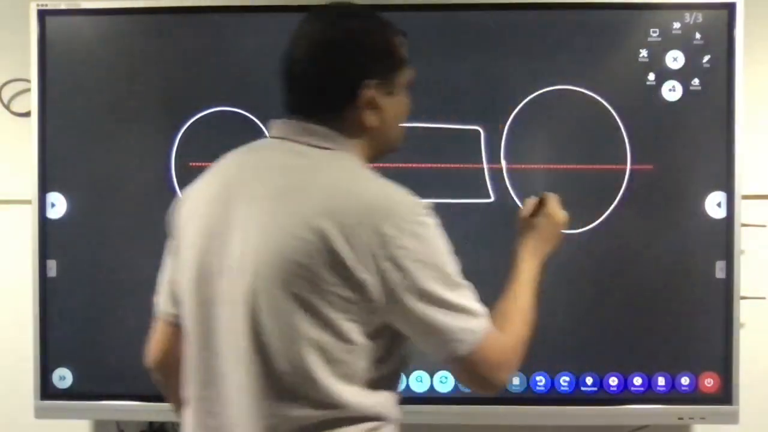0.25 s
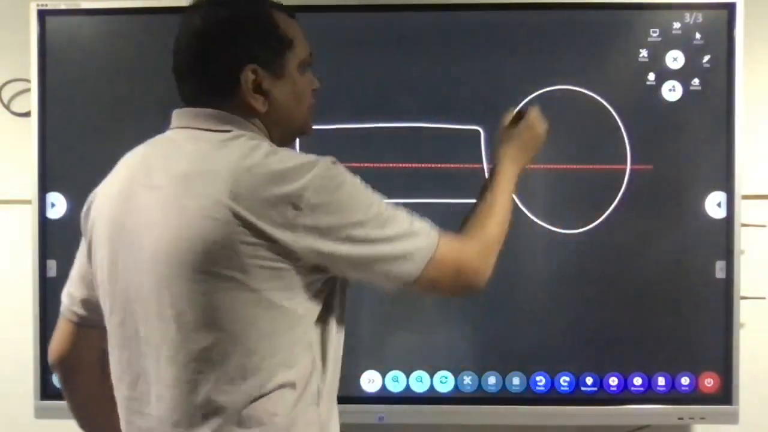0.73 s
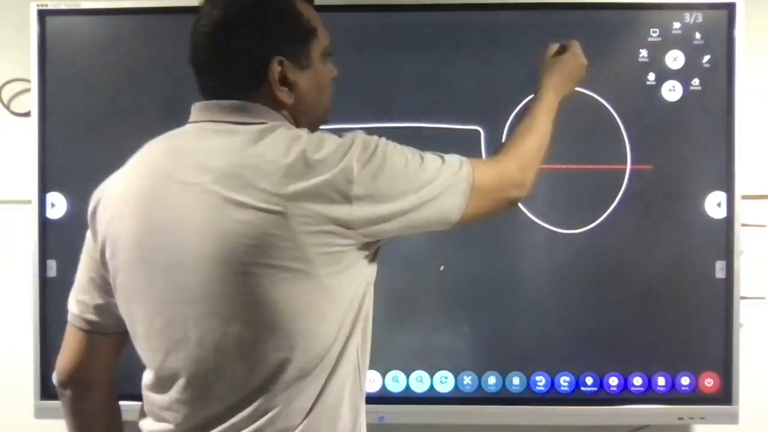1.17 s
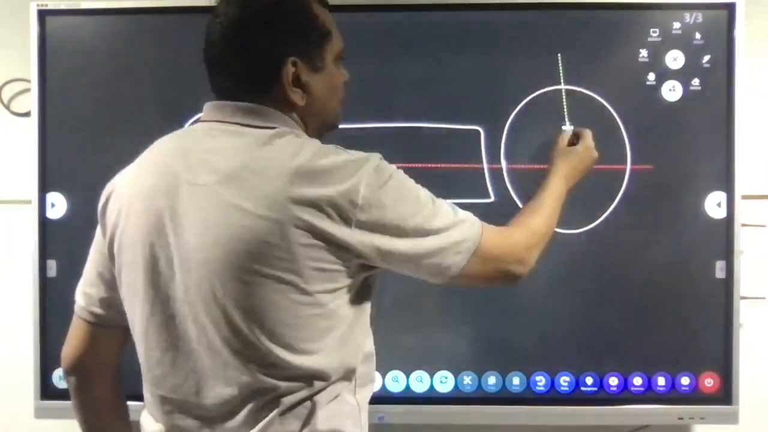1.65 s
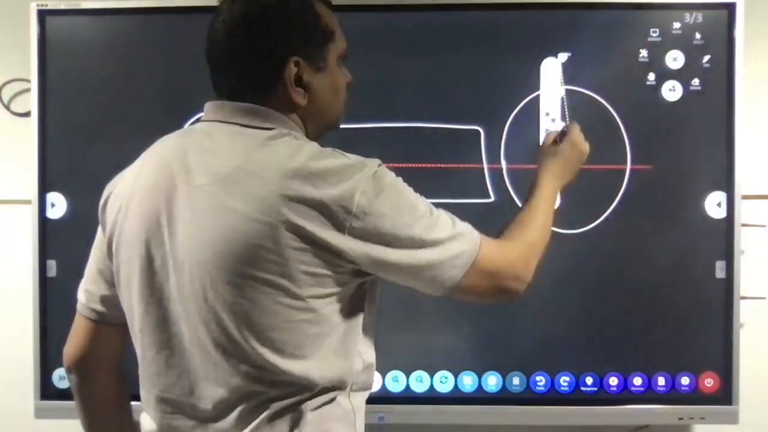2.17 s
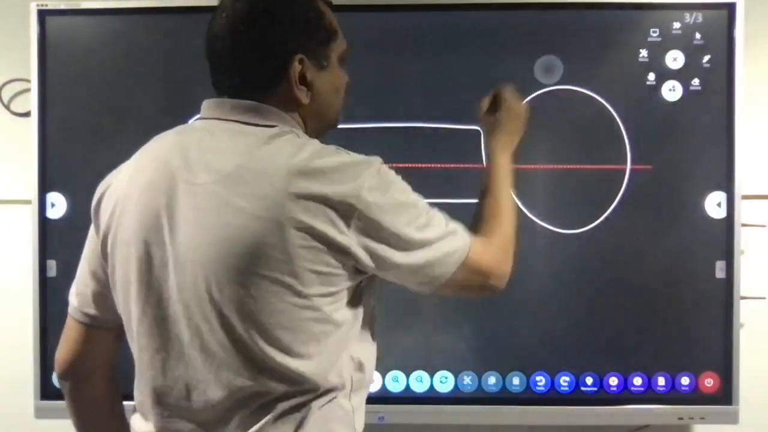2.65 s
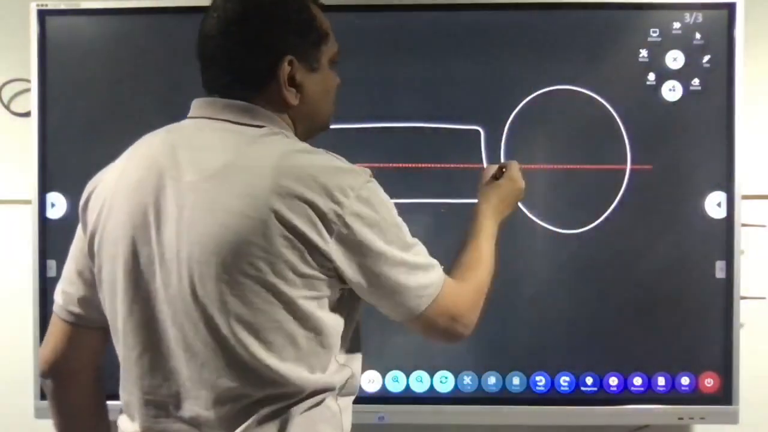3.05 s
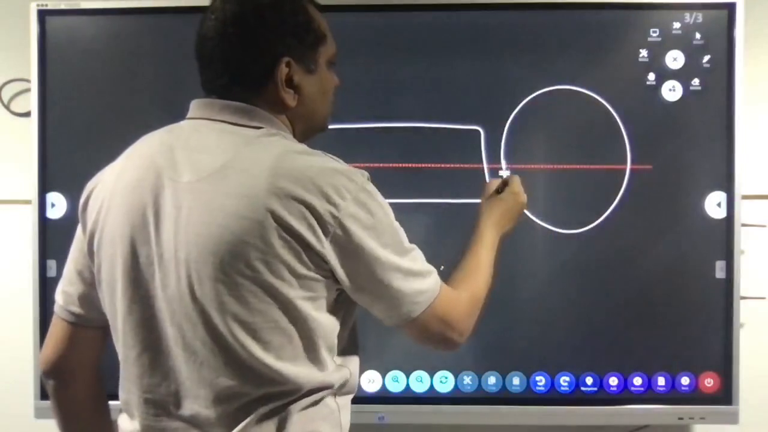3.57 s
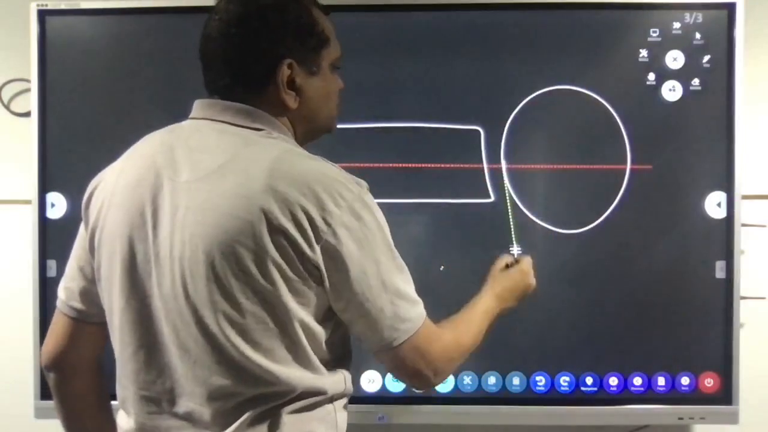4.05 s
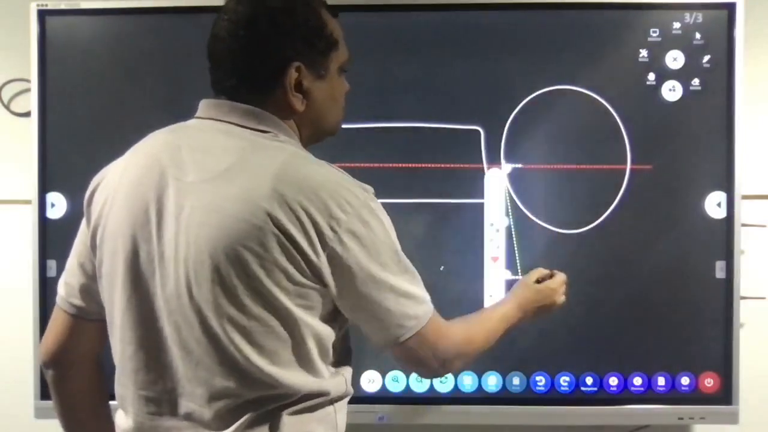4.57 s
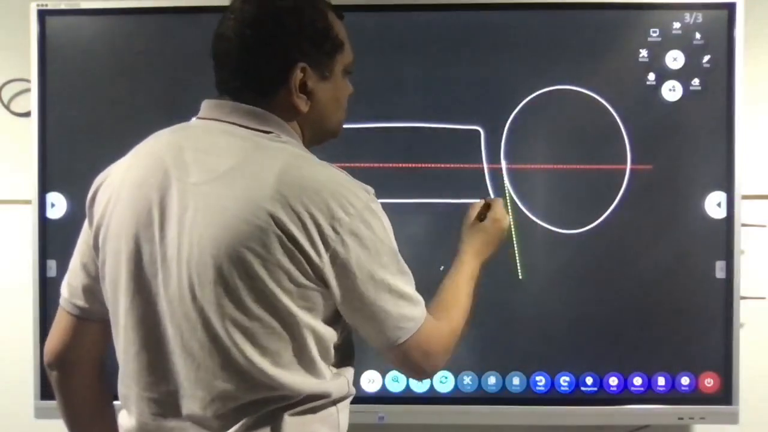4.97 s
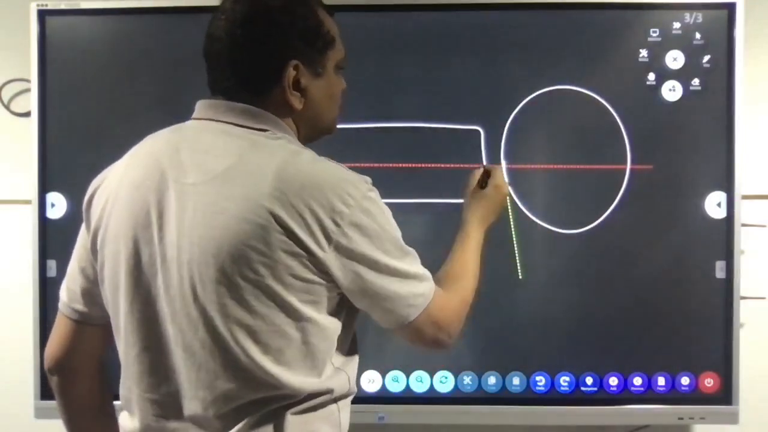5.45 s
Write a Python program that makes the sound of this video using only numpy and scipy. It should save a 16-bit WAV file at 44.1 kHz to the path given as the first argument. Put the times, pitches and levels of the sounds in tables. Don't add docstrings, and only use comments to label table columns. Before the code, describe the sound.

Shoes scuff and squeak, then irregular hollow stylus knocks and soft hissing strokes sound on a big glass panel under a thin electronic whine.

```python
import sys
import numpy as np
from scipy import signal
from scipy.io import wavfile
from scipy.ndimage import uniform_filter1d

SR = 44100
rng = np.random.default_rng(int(sys.argv[2]) if len(sys.argv) > 2 else 0)


def unload_audio(sound):
    columns = np.transpose(np.atleast_2d(sound))
    steps = np.round(np.clip(columns, -1, 1) * 32767)
    wavfile.write(sys.argv[1], SR, steps.astype(np.int16))


def invert_db(level):
    return 10 ** (np.asarray(level, dtype=float) / 20)


N = 252252


def evened(x):
    return x / np.sqrt(np.mean(x ** 2) + 1e-20)


def peaked(x, db):
    return invert_db(db) * x / np.sqrt(uniform_filter1d(x ** 2, size=220).max())


def read(points, hz):
    f, value = np.transpose(points)
    return np.interp(np.log(hz + 1), np.log(f + 1), value)


def add(mix, s, sound):
    at = round(s * SR)
    part = mix[max(at, 0):][:len(sound) + min(at, 0)]
    part += sound[max(-at, 0):][:len(part)]


def colour(x, db_at):
    hz = abs(np.fft.fftfreq(8192, 1 / SR))
    log_gain = db_at(hz) * np.log(10) / 20
    response = np.exp(np.conj(signal.hilbert(log_gain)))
    taps = np.fft.ifft(response).real[:4096]
    return signal.fftconvolve(x, taps)[:len(x)]


def impulse():
    blow = np.zeros(4096)
    blow[0] = 1
    return blow


def shelf(hz, edge_hz):
    return 1 / (1 + (edge_hz / (hz + 1)) ** 4)


def ring(modes, seconds):
    t = np.arange(round(seconds * SR)) / SR
    return sum(invert_db(db - 60 * t / t60) * np.sin(2 * np.pi * hz * t) for hz, db, t60 in modes)


def resonate(x, hz, width):
    turn = np.exp(2j * np.pi * np.cumsum(hz * np.ones(len(x))) / SR)
    r = np.exp(-np.pi * width / SR)
    return 2 * (turn * signal.lfilter([1 - r], [1, -r], x / turn)).real


# frequency in Hz, t60 in seconds.
ROOM_DECAY = [(100, 0.69), (260, 0.57), (700, 0.44), (1840, 0.62), (4200, 0.47), (6200, 0.49), (8000, 0.39),
              (16000, 0.5)]


def dying_noise(rise):
    hz, t, z = signal.stft(rng.standard_normal(SR), SR, nperseg=256)
    decay = invert_db(-60 * t / read(ROOM_DECAY, hz)[:, None])
    tail = signal.istft(z * decay, SR, nperseg=256)[1][:SR]
    return tail * (1 - np.exp(-np.arange(SR) / SR / rise)) ** 2


# delay in seconds, level in dB.
WALL_ECHOES = [(.0068, -3), (0.0129, -2), (0.023, -9)]


def room(x, wet_db, thin_hz, first_s, shade_db):
    tail = dying_noise(0.00043)
    early = np.zeros(SR)
    for k, (s, db) in enumerate([(.0004, shade_db), (first_s, -3)] + WALL_ECHOES):
        early[round(s * SR)] = invert_db(db) * (-1) ** k
    scatter = rng.standard_normal(90) * np.exp(-np.arange(90) / 19.0)
    scatter[0] = 0.88
    early = signal.lfilter(scatter / np.linalg.norm(scatter), 1, early)
    early[18] += invert_db(shade_db - 2.5)
    early[:31] -= invert_db(5) * np.hanning(31) / 15
    early = signal.lfilter(*signal.butter(1, thin_hz, "high", fs=SR), early)
    response = early + invert_db(wet_db) * tail / np.linalg.norm(tail)
    return signal.fftconvolve(x, response)[:SR]


# start in seconds, delay of the first wall in seconds,
# level in dB of the click that passes the writer's body.
LANDINGS = [
    (1.3234, .0037, -6),
    (2.4941, .0037, -2),
    (3.3402, .0045, -12),
    (4.655, .005, -13),
    (5.4287, .0045, -14),
    (5.5088, .004, -14),
]
# peak level in dB, boom of the panel in dB.
BLOWS = [
    (-23, -2),
    (-15, 1),
    (-29.5, 1),
    (-16.5, 0.3),
    (-36, 1.5),
    (-60, 1),
]
# frequency in Hz, density in dB per Hz.
GLASS = [(30, -52), (60, 1), (105, -10.5), (145, 7), (210, -3), (270, -0.5), (400, 0), (580, -1), (900, -8),
         (1300, -18.5), (1900, -18), (2500, -26), (6000, -27.5), (16000, -38.5)]
# frequency in Hz, level in dB, t60 in seconds.
PANEL = [(140, 0, 0.33), (194, -3, 0.37), (248, -4, 0.7), (305, -4, 0.5), (431, -8, 0.48), (490, -9, 0.44),
         (554, -11, 0.39), (689, -6, 0.3), (1534, -20, 0.34)]
# frequency in Hz, level in dB, t60 in seconds.
CASING = [(466.3, 0.5, 0.41), (579, 0, .28), (1063, -6.5, 0.48), (1123, -6, 0.36), (1520, -22, 0.15),
          (1920, -23, 0.41)]
# frequency in Hz, level in dB, t60 in seconds.
FRAME = [(789, -39, 5.3), (692, -43, 3.9)]
# frequency in Hz, level in dB, t60 in seconds.
BARREL = [(1580, -17, .09), (1805, -13, 0.057)]


def knock(first_s, shade_db, db, boom_db):
    harder_db = db + 23
    bright_db = -1.54 + 0.44 * harder_db
    hard_db = 1.26 + .3 * harder_db
    casing_db = -12 - 0.81 * harder_db
    blow = colour(impulse(), lambda hz: read(GLASS, hz) + bright_db * shelf(hz, 4200)
                  + hard_db * shelf(hz, 1430) + boom_db * (1 - shelf(hz, 254)))
    sound = peaked(room(blow, 2.83, 565, first_s, shade_db), db)
    swing = np.minimum(np.arange(SR) / SR / 0.034, 1)
    body = invert_db(-13.5 + boom_db) * ring(PANEL, 1)
    body = body + invert_db(min(casing_db, -11.5)) * ring(CASING, 1) + ring(FRAME, 1)
    barrel = invert_db(hard_db + .5 * shade_db) * ring(BARREL, 1)
    return sound + invert_db(db) * (swing * body + barrel)


# (without effect, the chatter stays at TIP_HZ).
STROKES = [
    (1.33, 1.555, 1.672, 4400, 4150),
    (3.45, 3.78, 4.2, 4150, 4950),
    (5.6, 5.78, 6.1, 3200, 5000),
]
# frequency in Hz, density in dB per Hz.
SLIDE = [(2400, -37.5), (3300, -20), (4500, 1), (5500, -12.5), (6500, -3.5), (9000, -2.5), (11500, -0.5),
         (13000, -17), (16000, -7)]
STROKE_DB, SPEED_UP_DB, SAG_DB_PER_S, LIFT_DB_PER_S = -53, 22, 12, 250
TIP_HZ, TIP_WANDER_HZ, SHANK_HZ = 4200, 90, 6250
CHATTER_SPAN_DB = 13
SHEEN_DB, SHEEN_GROWTH_DB = 2.5, 5
EARLY_SHARE, TIP_FADE_DB_PER_S = 0.46, 10


def stroke(start, fastest, lift, start_hz, chatter_hz):
    t = np.arange(SR) / SR + start
    slow = np.clip((fastest - t) / (fastest - start), 0, 1)
    since_fastest = np.maximum(t - fastest, 0)
    speed_db = (-SPEED_UP_DB * slow ** 2 - SAG_DB_PER_S * since_fastest
                - LIFT_DB_PER_S * np.maximum(t - lift, 0))
    grains = rng.standard_normal((len(t), 2)).T
    rub = grains[0] * invert_db(0.69 * evened(uniform_filter1d(grains[1], size=90)))
    wide = evened(colour(rub, lambda hz: read(SLIDE, hz)))
    sheen = signal.filtfilt(*signal.butter(2, 9000, "high", fs=SR), wide)
    travelled = np.minimum((t - start) / (lift - start), 1)
    wide = wide + sheen * (invert_db(SHEEN_DB + SHEEN_GROWTH_DB * (travelled - .5)) - 1)
    wander = np.interp(t, start + np.linspace(0, 1, num=16), rng.standard_normal(16))
    tip = evened(resonate(rub, TIP_HZ + (start_hz - TIP_HZ) * slow ** 2 + TIP_WANDER_HZ * wander, 240))
    tip = tip * invert_db(EARLY_SHARE * SPEED_UP_DB * slow ** 2 - TIP_FADE_DB_PER_S * since_fastest)
    shank = evened(resonate(rub, SHANK_HZ, 400))
    pace = np.clip(speed_db / CHATTER_SPAN_DB, 0, 1)
    chatter = evened(resonate(rub, TIP_HZ + (chatter_hz - TIP_HZ) * pace, 560))
    sound = wide + invert_db(-12.0) * tip + invert_db(-11.5) * chatter + invert_db(-22) * shank
    fade_in = np.minimum((t - start) / .02, 1)
    return fade_in * invert_db(STROKE_DB + speed_db + 5.5) * sound


# start in seconds, length in seconds,
# frequency in Hz, level in dB.
CHIRPS = [
    (1.005, .105, 5430, -73),
    (1.245, .08, 5480, -73),
    (.72, .19, 3150, -65),
    (5.485, .035, 3600, -71),
    (5.53, .03, 3500, -72),
    (.925, .045, 760, -54),
    (2.93, .04, 720, -57),
]


def chirp(length, hz, db):
    noise = rng.standard_normal(8820)[:round(length * SR)]
    whistle = evened(resonate(resonate(noise, hz, 90), hz, 70))
    return invert_db(db) * whistle * signal.windows.tukey(len(noise), .6)


# start in seconds, peak level in dB, thud of the sole in dB, rise in seconds.
SCUFFS = [
    (-.03, -47.5, 11.5, 0.017),
    (.146, -42.5, 5, 0.0057),
    (.388, -42.5, 7.5, 0.018),
    (.448, -37, -5.5, 0.0034),
    (.5, -48.5, -6, 0.45),
    (.648, -39, -12.5, 0.0093),
]
# frequency in Hz, density in dB per Hz.
SOLE = [(120, -55), (300, -10), (450, -1), (600, 0), (900, -11), (1900, -15.5), (3500, -10.5),
        (5500, -13.5), (9000, -20), (16000, -30.5)]


def scuff(db, thud_db, rise):
    rub = colour(dying_noise(rise), lambda hz: read(SOLE, hz) + thud_db * (1 - shelf(hz, 2750)))
    return peaked(rub, db)


def heel(db):
    click = colour(impulse(), lambda hz: read(SOLE, hz))
    return peaked(room(click, 1.9, 270, 0.00135, -1.5), db)


# frequency in Hz, width in Hz, level in dB, t60 in seconds.
SQUEAK = [(4770, 240, 0, .48), (4250, 220, -6, .36), (5850, 200, -15, .36)]


def squeak(peak_db):
    t, noise = np.arange(SR) / SR, rng.standard_normal(SR)
    bands = np.zeros(SR)
    for hz, width, db, t60 in SQUEAK:
        band = evened(resonate(resonate(noise, hz, width), hz, width))
        bands += invert_db(db - 60 * t / t60) * band
    return peaked(bands * np.minimum(t / 0.023, 1) ** 2, peak_db)


# start in seconds, level in dB.
THUDS = [
    (.147, -42),
    (.449, -36.5),
]
# frequency in Hz, level in dB, t60 in seconds.
SLAB = [(505, 0, 0.26), (599.6, -2.5, 0.23), (689, -5.5, 0.19)]


def thud(db):
    return invert_db(db) * ring(SLAB, .5) * np.minimum(np.arange(SR // 2) / SR / .004, 1)


TICK_DB = [
    -47.5,
    -54,
    -49.5,
    -51.5,
    -51.5,
]
# frequency in Hz, density in dB per Hz.
CLOCK = [(300, 3.5), (600, 2), (760, -2), (1100, -7), (1700, -2.5), (2500, -4), (4000, -6.5), (6000, -17),
         (9000, -28)]
FIRST_TICK_S, TICK_PERIOD_S = .927, 1.0


def tick(db):
    return peaked(colour(dying_noise(.007), lambda hz: read(CLOCK, hz)), db)


# time in seconds, frequency in Hz.
DRIFT = [(0.15, 10645), (5.6, 10643)]
# order of the mains ripple, rms level in dB.
HIGH_COMB = [(-10, -81), (-8, -73), (-7, -66), (-6, -73), (-5, -65), (-4, -60), (-2, -61), (-1, -68),
             (0, -55), (1, -63), (2, -67), (3, -77)]
# order of the mains ripple, rms level in dB.
LOW_COMB = [(-8, -93), (-7, -87), (-6, -87), (-5, -86), (-4, -73), (-3, -76), (-2, -78), (-1, -69),
            (0, -70), (1, -76)]
HIGH_HZ, LOW_HZ, RIPPLE_HZ = 10643.5, 9709.6, 100.05
STRAY_HZ, STRAY_DB = 13485, -93
SWEEP = .12


def whine():
    t = np.arange(N) / SR
    s, hz = np.transpose(DRIFT)
    clock = np.cumsum(np.interp(t, s, hz) / HIGH_HZ) / SR
    lines = [(HIGH_HZ + RIPPLE_HZ * k, db) for k, db in HIGH_COMB]
    lines += [(LOW_HZ + RIPPLE_HZ * k, db) for k, db in LOW_COMB]
    out = np.zeros(N)
    for line_hz, db in lines + [(STRAY_HZ, STRAY_DB)]:
        lag = np.pi * SWEEP * ((line_hz - HIGH_HZ) / RIPPLE_HZ) ** 2
        swell = np.interp(t, np.linspace(0, N / SR, num=30), rng.standard_normal(30))
        out += np.sqrt(2) * invert_db(db + .4 + 2.3 * swell) * np.sin(2 * np.pi * line_hz * clock - lag)
    return out


# frequency in Hz, density in dB per Hz.
AIR = [(12, -56), (22, 16), (48, 0), (120, -1.5), (250, -12.5), (1100, -16), (2200, -34), (2800, -40),
       (5400, -38), (8400, -48), (10500, -16.5), (11300, -42), (13200, -41.5), (16000, -38)]
AIR_DB = -50.5


def air():
    frames, hz = N // 256 + 5, np.fft.rfftfreq(1024, 1 / SR)
    a, b, patches = rng.standard_normal((frames, 513, 3)).T
    patches = uniform_filter1d(patches, size=10, axis=0)
    patches = evened(uniform_filter1d(patches, size=20, axis=1))
    depth_db = 2.0 - .7 * shelf(hz, 600)
    z = (a + 1j * b) * invert_db(read(AIR, hz)[:, None] + depth_db[:, None] * patches)
    return invert_db(AIR_DB) * evened(signal.istft(z, nperseg=1024, noverlap=768)[1][:N])


# frequency in Hz, gain in dB.
HOUSING = [(1200, -2), (2100, -6.5), (2900, -15), (3900, -3), (6000, -0.94), (7400, -6.5), (8600, -17.5),
           (9500, -6), (10600, -4.5), (12500, -4.5), (15000, -6.5)]


def scene():
    mix = np.zeros(N)
    for (s, *path), blow in zip(LANDINGS, BLOWS):
        add(mix, s, knock(*path, *blow))
    for row in STROKES:
        add(mix, row[0], stroke(*row))
    for table, source in ((CHIRPS, chirp), (SCUFFS, scuff), (THUDS, thud)):
        for s, *row in table:
            add(mix, s, source(*row))
    add(mix, .4545, heel(-30.5))
    add(mix, .66, squeak(-34.5))
    for k, db in enumerate(TICK_DB):
        add(mix, FIRST_TICK_S + k * TICK_PERIOD_S, tick(db))
    return (colour(mix, lambda hz: read(HOUSING, hz)) + air() + whine())[None]


def roll_off(x):
    return signal.sosfilt(signal.butter(12, 17010, fs=SR, output="sos"), x)


def record(dry):
    limit = signal.firwin(511, 15800, window=("kaiser", 9), fs=SR)
    mix = signal.oaconvolve(dry, limit[None], "same")
    return roll_off(mix)


dry = scene()
out = record(dry)
unload_audio(out)
```